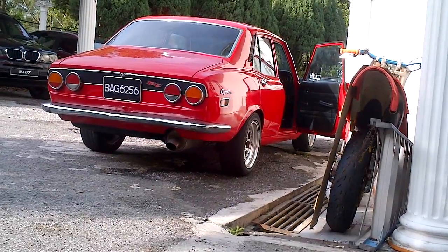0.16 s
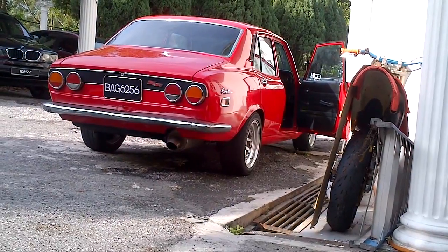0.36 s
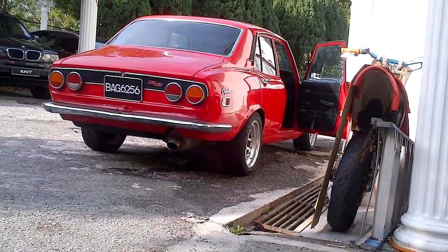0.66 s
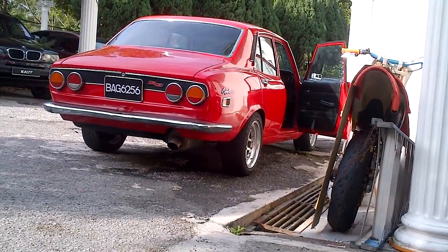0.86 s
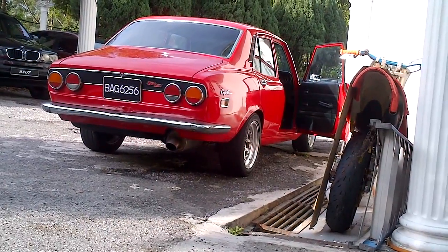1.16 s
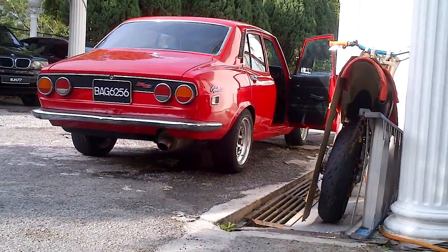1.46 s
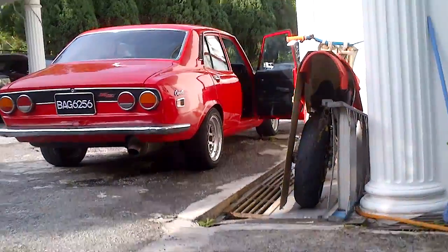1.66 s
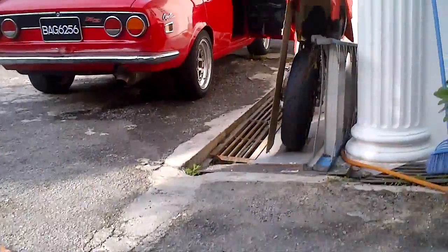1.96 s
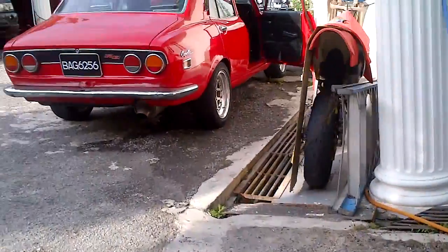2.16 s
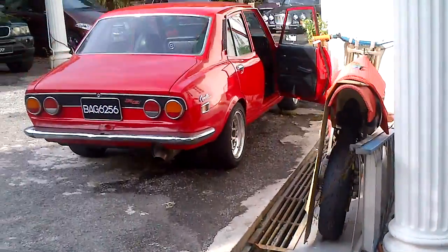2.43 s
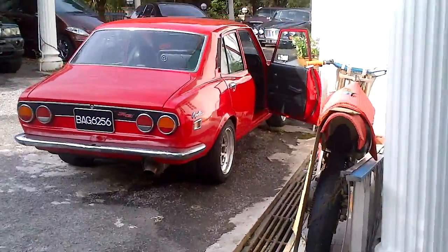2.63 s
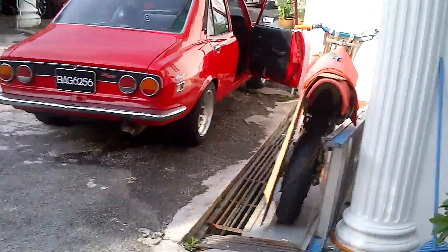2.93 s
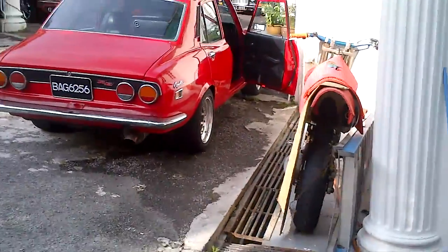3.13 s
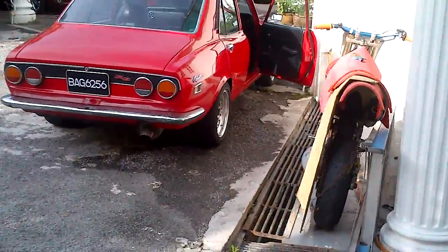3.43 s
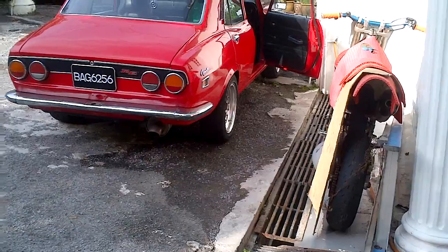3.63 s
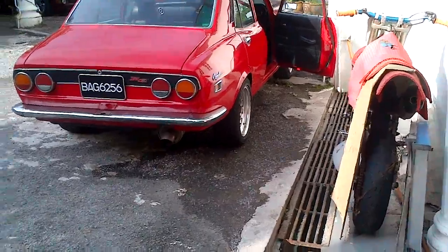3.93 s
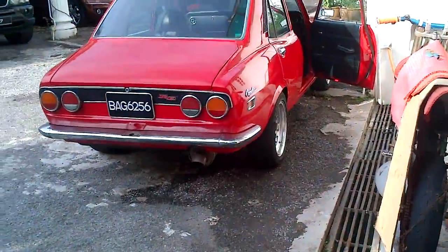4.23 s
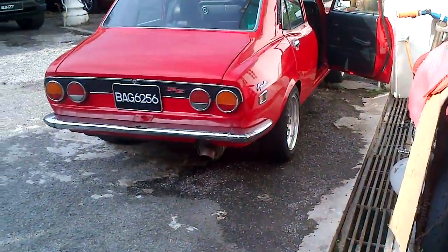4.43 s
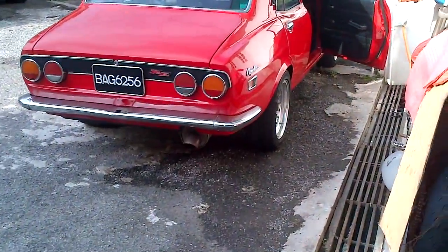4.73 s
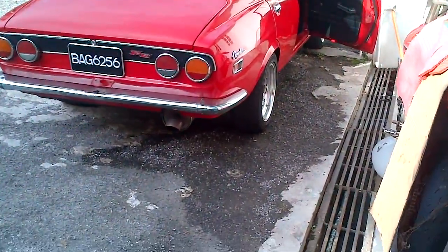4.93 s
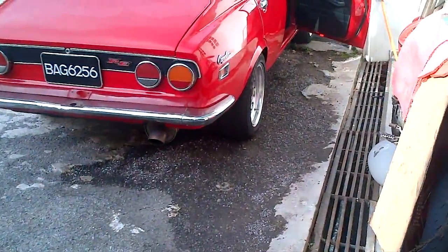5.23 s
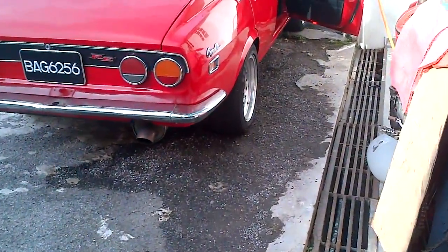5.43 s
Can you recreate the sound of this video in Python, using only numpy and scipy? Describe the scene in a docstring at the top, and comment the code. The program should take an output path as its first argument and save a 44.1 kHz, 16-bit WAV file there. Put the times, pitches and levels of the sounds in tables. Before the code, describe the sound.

A car engine idles with a lumpy, loping rhythm, its exhaust thumping and spitting, sounding closer as the listener approaches the tailpipe.

```python
"""A paved yard, a few steps behind an idling rotary-engined car; the listener edges towards the tailpipe.
The idle lopes: four hard, quick firings that spit gas, then eight soft, slow ones. Each firing sends a
pulse that reflects along the pipe, drives the resonances of the large muffler, leaves as a turbulent jet
and echoes off the walls. Behind it the engine bay adds a rush, a faint whine and a few ticks and knocks."""
import sys
import numpy as np
from scipy import signal
from scipy.fft import rfft, irfft
from scipy.io import wavfile
from scipy.ndimage import uniform_filter1d

SR = 44100
rng = np.random.default_rng(int(sys.argv[2]) if len(sys.argv) > 2 else 0)


def materialize(psi):
    """Save the field psi as 16-bit PCM at rate SR to the path in sys.argv[1].

    A 1-D psi becomes a single channel; in a 2-D psi each row is a channel.
    """
    bounded = np.clip(np.atleast_2d(psi).T, -1, 1)
    quanta = np.round(bounded * 32767).astype(np.int16)
    wavfile.write(sys.argv[1], SR, quanta)


N = 246519
TIME = np.arange(N) / SR


def from_db(db):
    """Amplitude ratio of a level in decibels."""
    return 10 ** (np.asarray(db) / 20)


def rms_one(x):
    """Normalisation to unit power."""
    return x / np.sqrt(np.mean(x ** 2) + 1e-20)


def noise(spectrum):
    """Spectral shaping: unit-power noise that follows (Hz, dB) points and rolls off beyond them."""
    hz, db = np.transpose(spectrum)
    f = np.arange(N // 2 + 1) * SR / N + 1e-3
    roll_off = 1 / (1 + (hz[0] / f) ** 8) / (1 + (f / hz[-1] / 2) ** 8)
    colour = from_db(np.interp(np.log(f), np.log(hz), db))
    return rms_one(irfft(rfft(rng.standard_normal(N)) * roll_off * colour, N))


def drift(rate):
    """Random modulation of unit power, interpolated between `rate` values a second."""
    knots = rng.standard_normal(4000)
    return rms_one(np.interp(TIME * rate, np.arange(len(knots)), knots))


def delayed(x, ms):
    """Propagation delay."""
    return np.interp(TIME - ms / 1000, TIME, x, left=0)


def resonance(x, hz, width_hz):
    """Damped resonator: a two-pole band-pass with unit peak gain."""
    r = np.exp(-np.pi * width_hz / SR)
    poles = [1, -2 * r * np.cos(2 * np.pi * hz / SR), r * r]
    return signal.lfilter(np.array([1, 0, -1]) * (1 - r * r) / 2, poles, x)


def narrow_noise(hz, width_hz):
    """Narrow-band noise of unit power, from two resonators in cascade."""
    return rms_one(resonance(resonance(rng.standard_normal(N), hz, width_hz), hz, width_hz))


def impulses(times, heights):
    """Impulse train with the given times in seconds."""
    train = np.zeros(N)
    np.add.at(train, np.clip(np.round(times * SR).astype(int), 0, N - 1), heights)
    return train + 1e-18


def bursts(times, db, rise_s, t60):
    """Exponential decay: the power envelope of bursts that swell, then fall 60 dB in t60 seconds."""
    fall, rise = from_db(-60 / (t60 * SR)) ** 2, np.exp(-1 / (rise_s * SR))
    decays = signal.lfilter([1], [1, -fall], impulses(times, from_db(db) ** 2))
    return signal.lfilter([1 - rise], [1, -rise], decays)


# The listener's path. Each row: time in seconds, nearness (0 far, 1 close), level of the rush in dB.
LISTENER_PATH = [(0, 0.08, -35.5), (1.7, 0.24, -35), (2.7, 0.89, -35.5), (4, 0.94, -34.5), (5.6, 1, -32)]

def walk():
    """The sound field varies with position: nearness and rush level along the listener's path."""
    s, near, rush_db = np.transpose(LISTENER_PATH)
    return np.interp(TIME, s, near), np.interp(TIME, s, rush_db)


# Spectrum of the rush. Each row: frequency in Hz, relative spectral density in dB.
RUSH_SPECTRUM = [(25, 13), (70, 12.5), (130, 15), (260, 5.5), (400, -6), (520, -6), (850, -5.5),
                 (1400, -17), (1800, -15.5), (2600, -21), (5200, -23), (8000, -32), (15000, -31)]

def bay_rush(level_db):
    """Broadband noise: the engine bay rushes, most strongly in the bass."""
    return from_db(level_db) * noise(RUSH_SPECTRUM)


# Partials of the whine. Each row: harmonic number, far level in dB, close level in dB.
WHINE_HARMONICS = [(2, -49.5, -51), (3, -60, -57.5), (4, -71.5, -51.5), (5, -62.5, -68), (6, -69.5, -61),
                   (8, -86, -64)]
# The lowest partial fades for a while. Each row: time in seconds, gain in dB.
LOWEST_PARTIAL_FADE = [(2.4, 1.5), (3.1, -5.5), (3.95, -13), (4.2, 5)]

def accessory_whine(near, base_hz=208.8, wander=0.00501, flutter_db=2, whistle_db=-75):
    """Harmonic series: fan and alternator share one wandering pitch, beside a faint high whistle."""
    phase = 2 * np.pi * np.cumsum(base_hz * (1 + wander * drift(20))) / SR
    partials = [from_db(far + near * (close - far) + flutter_db * drift(17)) * np.sin(k * phase)
                for k, far, close in WHINE_HARMONICS]
    fade = from_db(np.interp(TIME, *np.transpose(LOWEST_PARTIAL_FADE)))
    whistle = from_db(whistle_db) * narrow_noise(hz=7520, width_hz=14)
    return np.sqrt(2) * (fade * partials[0] + sum(partials[1:])) + whistle


# Impacts of slack in the drive. Each row: offset from a lope's start in ms, relative level in dB.
BACKLASH_IMPACTS = [(-37, -40.5), (31, -38), (213, -43)]
# Stray mechanical ticks. Each row: start in seconds, relative level in dB.
STRAY_TICKS = [(5.016, -36.5), (5.211, -44.5)]
# Spectrum of a tick. Each row: frequency in Hz, relative spectral density in dB.
TICK_SPECTRUM = [(900, 26), (1500, 1.5), (2000, 12.5), (3100, -7.5), (4500, -11)]

def ticks(level_db=-4, scatter_db=1.0):
    """Backlash: the drive ticks as it takes up and drops the load in each lope, with a few strays."""
    slack = [(start + ms / 1000, db - scatter_db * rng.standard_normal())
             for start, *_ in LOPES if start > 0 for ms, db in BACKLASH_IMPACTS]
    s, db = np.transpose(slack + list(STRAY_TICKS))
    return np.sqrt(bursts(s, db + level_db, rise_s=0.00042, t60=0.099)) * noise(TICK_SPECTRUM)


# Knocks of loose parts. Each row: start in seconds, level in dB, frequency in Hz, bandwidth in Hz.
LOOSE_PARTS = [(1.556, -36.5, 2700, 1600), (2.759, -35.5, 845, 800), (3.3165, -28, 520, 330)]

def knocks():
    """Heavily damped impacts: each loose part gives a short, broad band of noise."""
    return sum(np.sqrt(bursts(s, db, rise_s=0.00097, t60=0.021)) * narrow_noise(hz, width)
               for s, db, hz, width in LOOSE_PARTS)


def yard_echoes(x, level_db=-7.0, t60=0.33, first_s=0.009, band_hz=(116.5, 820)):
    """Reverberation: ground and walls scatter dull reflections; the deep bass stays dry."""
    t = TIME[:SR // 2]
    tail = rms_one(rng.standard_normal(len(t)) * from_db(-60 * t / t60) * (t > first_s))
    tail = signal.sosfilt(signal.butter(3, band_hz, "band", fs=SR, output="sos"), tail / np.sqrt(len(t)))
    return from_db(level_db) * signal.fftconvolve(x, tail)[:N]


# Chirps of gas at the tailpipe lip. Each row: start in seconds, relative level in dB, frequency in Hz.
LIP_CHIRPS = [(0.7876, -42, 5170), (0.981, -27, 5200), (1.5825, -31, 5100), (2.6835, -45, 5140),
              (2.795, -29, 6130), (2.8923, -32, 6360), (4.554, -43, 5380), (4.6179, -39, 5540),
              (4.729, -35, 6520), (4.866, -32, 6400)]

def chirps(level_db=-5, ring_db=-13):
    """Flow-excited tones: gas whistles briefly at the lip and leaves a thin ring behind."""
    whistles = sum(np.sqrt(bursts(s, db + level_db, rise_s=0.00052, t60=0.036))
                   * narrow_noise(hz, width_hz=260) for s, db, hz in LIP_CHIRPS)
    s, db, _ = np.transpose(LIP_CHIRPS)
    ring_power = bursts(s, db + ring_db, rise_s=0.0058, t60=0.18)
    return whistles + np.sqrt(ring_power) * narrow_noise(hz=5300, width_hz=210)


# Tailpipe modes. Each row: frequency in Hz, bandwidth in Hz, far and close gains in dB.
TAILPIPE_MODES = [(3063, 320, -23.5, -24), (4070, 39, -21.5, -22.5), (4420, 230, -24, -20.5),
                  (4952, 110, -16, -24.5), (5190, 100, -16, -21.5), (5450, 160, -22, -19),
                  (6040, 270, -32, -21)]

def tailpipe_ring(fired, near):
    """Free vibration: the modes of the steel tailpipe ring on after each spit."""
    s, _, _, hiss_db = np.transpose(fired)
    modes = sum(from_db(far + near * (close - far)) * narrow_noise(hz, width)
                for hz, width, far, close in TAILPIPE_MODES)
    return np.sqrt(bursts(s, hiss_db, rise_s=0.001, t60=0.44)) * modes


def wavefronts(fired):
    """Steepness is amplitude over rise time: each pulse's time, and its dB relative to the steepest."""
    s, thump_db, opening_ms, _ = np.transpose(fired)
    steep_db = thump_db - 20 * np.log10(opening_ms)
    return s, steep_db - steep_db.max()


# Hollow modes of the muffler box. Each row: frequency in Hz, bandwidth in Hz, far and close levels in dB.
BOX_MODES = [(468.7, 4.5, -38.5, -43), (725.3, 7, -37, -36), (808, 9.3, -52, -43)]

def hollow_box(fired, near):
    """Impulse response: steep pulses strike the muffler box, which answers with a short hollow note."""
    s, steep_db = wavefronts(fired)
    strikes, out = impulses(s, from_db(steep_db)), 0
    for hz, width, far, close in BOX_MODES:
        ring = resonance(strikes, hz, width) * SR / (2 * np.pi * width)   # unit strike, unit amplitude
        out = out + from_db(far + near * (close - far)) * ring
    return out


def snaps(fired, level_db=-1, softening_db_per_ms=3):
    """A brief transient has a broad spectrum: each steep wavefront snaps at the tailpipe lip."""
    s, _, opening_ms, hiss_db = np.transpose(fired)
    snap_db = hiss_db + level_db - softening_db_per_ms * (opening_ms - 1)
    power = bursts(s - .0004, snap_db, rise_s=0.00031, t60=0.0054)
    return np.sqrt(power) * narrow_noise(hz=5500, width_hz=2600)


# Round trips in the exhaust pipe. Each row: delay in ms, gain as a ratio.
PIPE_ROUND_TRIPS = [(15.1, .62), (30.6, .12)]

def pipe_echoes(x):
    """Reflection at the pipe's ends: a pulse returns weaker after each round trip."""
    return sum(gain * delayed(x, ms) for ms, gain in PIPE_ROUND_TRIPS)


# Spectrum of the gas jet. Each row: frequency in Hz, far and close relative spectral densities in dB.
JET_SPECTRUM = [(1800, -50, 0.5), (2740, -49, -27), (3600, -11, -7), (4570, 7.5, 4.5), (5400, -3, 0.5),
                (6600, -2, 5), (8350, -4.5, -5.5), (9500, 2, -2), (11400, -5, 1), (13500, -2.5, 1),
                (15600, -5, -5)]

def jet_noise(near, patchy_db=2.8):
    """Turbulent jet noise of unit power, in narrow bands that swell and fade independently."""
    hz, far_db, close_db = np.transpose(JET_SPECTRUM)
    edges = np.geomspace(1600, 16000, 25)
    white, out = rng.standard_normal((2, N)), 0
    for k, (low, high) in enumerate(zip(edges, edges[1:])):
        far, close = (np.interp(np.log(low * high) / 2, np.log(hz), db) for db in (far_db, close_db))
        band = signal.sosfilt(signal.butter(2, [low, high], "band", fs=SR, output="sos"), white[k % 2])
        out = out + band * from_db(far + near * (close - far) + patchy_db * drift(26))
    return rms_one(out)


def spit(fired, near, crack_db=2.5, tail_db=-5, sputter_db=0.5, slow_crack_boost_db_per_ms=2.0):
    """Pulsed jet: gas tears past the tailpipe lip with a sharp crack, then a sputtering hiss."""
    s, _, opening_ms, hiss_db = np.transpose(fired)
    boost_db = slow_crack_boost_db_per_ms * (opening_ms - 1)   # extra level for slowly opening firings
    crack = bursts(s - .0012, hiss_db + crack_db + boost_db, rise_s=0.0015, t60=0.017)
    crack = crack + 0.029 * delayed(crack, PIPE_ROUND_TRIPS[0][0])
    hard_db = 0.15 * (hiss_db - hiss_db.max())   # hard firings leave a stronger tail
    tail = bursts(s, hiss_db + hard_db + tail_db, rise_s=0.006, t60=0.24)
    jet = jet_noise(near)
    hiss = np.sqrt(crack + tail) * from_db(-sputter_db * drift(770) - 2.5) * jet
    return hiss + 0.11 * delayed(hiss, ms=0.73 * (1 + 0.44 * near))   # ground reflection: a comb filter


# Turbulence at the pipe mouth, far and close. Each row: frequency in Hz, relative spectral density in dB.
BARK_SPECTRUM_FAR = [(120, 1), (230, 4.5), (310, 8.5), (380, 0.5), (470, 0.5), (560, -8), (850, -7),
                     (1150, -14.5), (1450, -59), (2400, -31)]
BARK_SPECTRUM_CLOSE = [(120, -42), (230, 3.5), (320, 0), (440, -20), (600, -6.5), (730, -6), (790, -7.5),
                       (1000, -19.5), (1450, -24), (2400, -30)]

def bark(fired, near, level_db=-21.0, tail_db=-12, far_db=3.5):
    """Modulated turbulence: noise rides on each pulse and its pipe echoes, and lingers in the yard."""
    s, steep_db = wavefronts(fired)   # steep pulses bark hardest
    direct = bursts(s - .0015, steep_db, rise_s=0.0037, t60=0.034)
    lingering = bursts(s, steep_db + tail_db, rise_s=0.014, t60=0.72)
    far = np.sqrt(1 - near) * from_db(far_db) * noise(BARK_SPECTRUM_FAR)
    close = np.sqrt(near) * noise(BARK_SPECTRUM_CLOSE)
    return from_db(level_db) * np.sqrt(direct + pipe_echoes(direct) + lingering) * (far + close)


# The twelve firings of a lope, four hard then eight soft.
# Each row: relative thump level in dB, opening time in ms, relative hiss level in dB.
LOPE_FIRINGS = [(-10, 1.29, -37), (-10.5, 1.13, -38), (-8, 1.26, -35.5), (-7.5, 0.97, -33.5),
                (-10, 3.13, -60), (-11.5, 4.06, -56.5), (-15.5, 2, -53), (-7.5, 5.33, -57.5),
                (-10, 3.24, -56.5), (-17, 1.57, -48.5), (-12, 1.84, -45.5), (-15, 1.27, -46.5)]
# Their rhythm. Each entry: time into a lope of nominal length, in ms.
FIRING_TIMES_MS = [0, 48.6, 95.1, 138.3, 191.5, 239.5, 291, 349, 414, 471.5, 537, 594.6]
# The engine catches and a lope begins. Each row: start in seconds, then gains in dB for the hard thumps,
# the soft thumps, the hiss and the kick of the last hard firing.
LOPES = [(-0.42, 0, 0, 0, 0), (0.171, 0, -1.5, 0.3, -1), (0.845, -0.5, -1.2, -0.2, 1.5),
         (1.489, -0.9, -1.5, -1, 1), (2.1466, 0, -1.5, -0.3, -0.5), (2.7969, -0.8, -2, -1.5, -0.4),
         (3.447, -0.2, 0, -0.9, -0.5), (4.0876, 0, 1.2, 0.9, -0.5), (4.73, 1.5, 2, 0.8, 0),
         (5.3765, 2.5, 2.5, 0.7, -0.5)]

def firings(lope_s=0.65, scatter_db=0.5, kick_steepening=0.64):
    """Quasi-periodic excitation. Each row returned: time in s, thump in dB, opening in ms, hiss in dB."""
    thump_db, opening_ms, hiss_db = np.transpose(LOPE_FIRINGS)
    beats_s, order = np.array(FIRING_TIMES_MS) / 1000, np.arange(len(LOPE_FIRINGS))
    hard, last_hard = order < 4, order == 3
    surge_s, lead_s = beats_s[3], lope_s - beats_s[-2]
    nominal = [0, surge_s, lope_s - lead_s, lope_s]
    ends = [row[0] for row in LOPES[1:]] + [LOPES[-1][0] + lope_s]
    rows = []
    for (start, hard_db, soft_db, spit_db, kick_db), end in zip(LOPES, ends):
        # The surge and the two firings leading into the next keep their pace; the coasting stretches.
        s = np.interp(beats_s, nominal, [start, start + surge_s, end - lead_s, end])
        gain_db = np.where(hard, hard_db, soft_db + scatter_db * rng.standard_normal(len(s)))
        kick = kick_db * last_hard
        opening = opening_ms * from_db(-kick_steepening * kick)
        rows += zip(s, thump_db + gain_db + kick, opening, hiss_db + spit_db + kick)
    return [row for row in rows if 0 < row[0] < TIME[-1]]


def gas_pulses(fired, closing_ratio=2.35):
    """Pulsating flow: each firing releases a lump of gas that builds fast and ebbs more slowly."""
    flow = np.zeros(N)
    for s, db, opening_ms, _ in fired:
        span = slice(max(0, int(s * SR) - SR // 40), int(s * SR) + SR // 20)
        age = (TIME[span] - s) * 1000 / opening_ms
        flow[span] -= from_db(db) * np.exp(-np.where(age < 0, age, age / closing_ratio) ** 2)
    return flow


# Resonances driven by the flow: the car body rocks at the lowest, the muffler rings at the others. Each row:
# frequency in Hz, bandwidth in Hz, gain in dB.
FLOW_RESONANCES = [(22.9, 3, -3.5), (186.7, 78, 2.5), (305, 30, -5)]

def thumps(fired, boom_hz=74, boom_q=1.65, level_db=0.64, smear_s=0.0021, choke_db=-8):
    """Forced resonance: the pulses and their rounded pipe echoes set the muffler booming."""
    flow = gas_pulses(fired)
    rounded = uniform_filter1d(flow, int(smear_s * SR))
    rounded = from_db(choke_db) * np.tanh(rounded / from_db(choke_db))   # strong pulses lose more
    flow = flow + pipe_echoes(rounded)
    flow = flow - 0.29 * delayed(flow, ms=4.57)   # a weaker copy with inverted phase follows 4.57 ms later
    omega = 2 * np.pi * boom_hz
    boom = signal.lfilter(*signal.bilinear([1, 0, 0], [1, omega / boom_q, omega ** 2], SR), flow)
    rings = sum(from_db(db) * resonance(flow, hz, width) for hz, width, db in FLOW_RESONANCES)
    return from_db(level_db) * (boom + rings)


def scene():
    """Superposition: exhaust, yard and engine bay add at one listening point."""
    near, rush_db = walk()
    fired = firings()
    thumping = thumps(fired)
    body = thumping + yard_echoes(thumping) + hollow_box(fired, near) + bark(fired, near)
    treble = spit(fired, near) + snaps(fired) + tailpipe_ring(fired, near) + chirps()
    engine_bay = bay_rush(rush_db) + accessory_whine(near) + ticks() + knocks()
    return (body + treble + engine_bay)[None]


def record(dry):
    """Band limiting: a steep low-pass removes the treble above 15.4 kHz."""
    return signal.sosfilt(signal.ellip(10, .1, 90, 15400, fs=SR, output="sos"), dry)


dry = scene()
out = record(dry)
materialize(out)
```